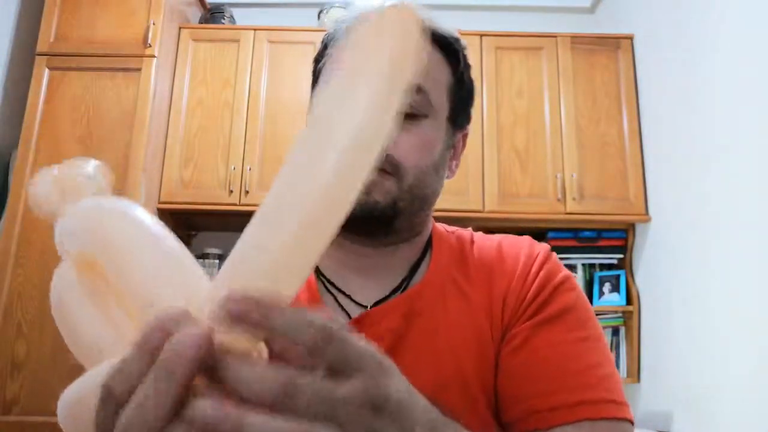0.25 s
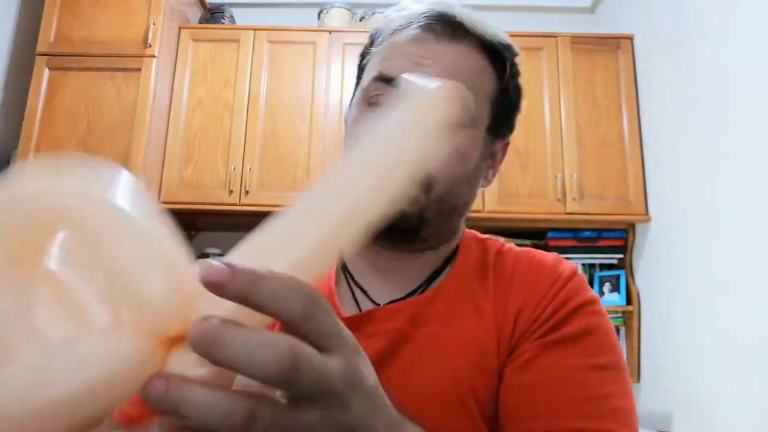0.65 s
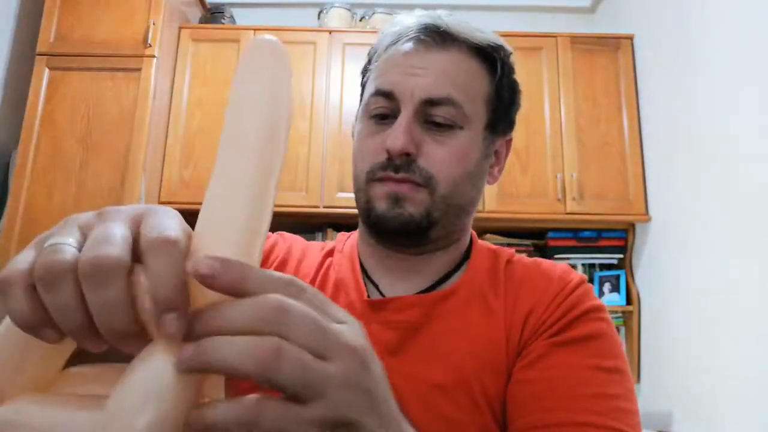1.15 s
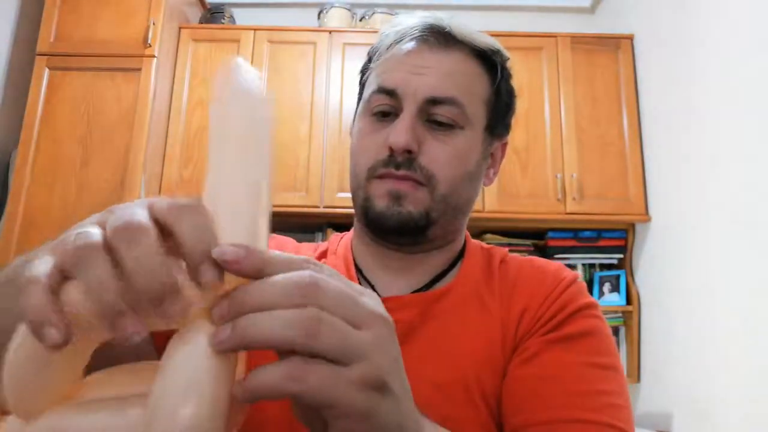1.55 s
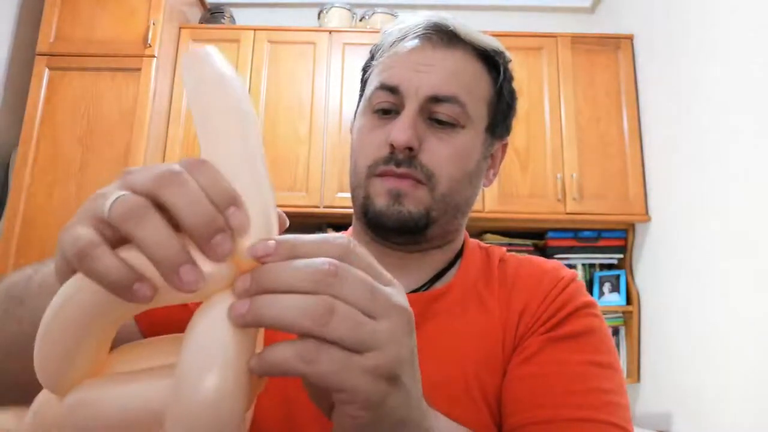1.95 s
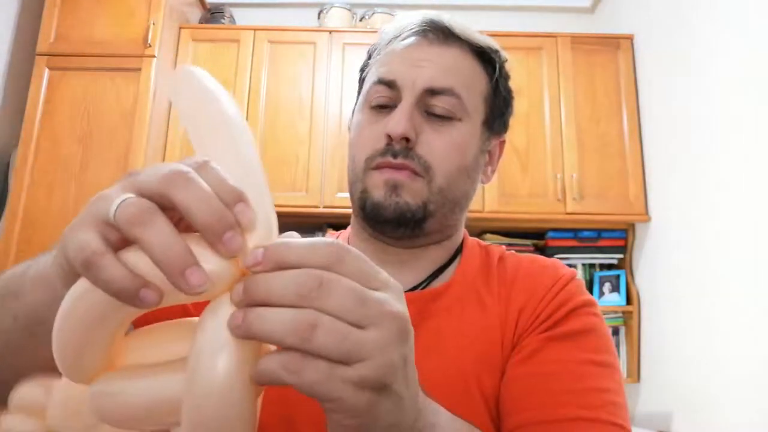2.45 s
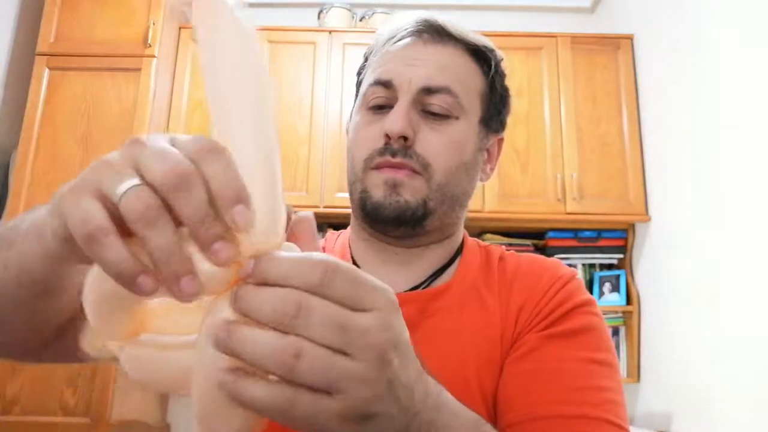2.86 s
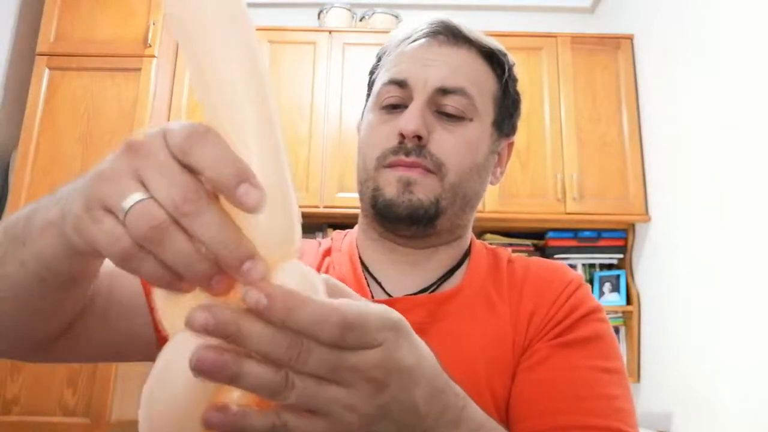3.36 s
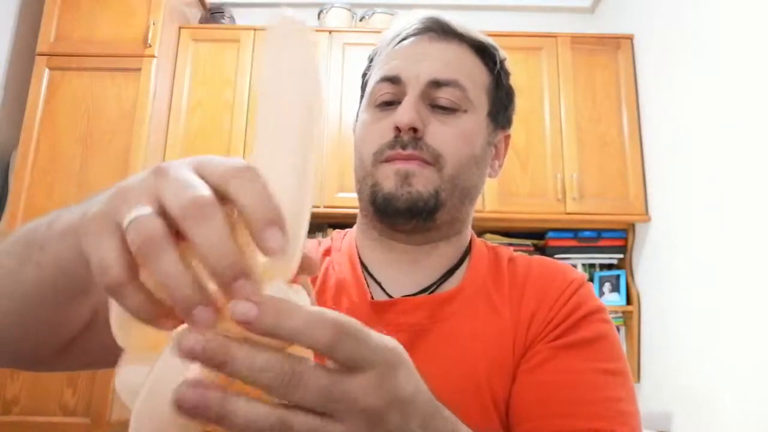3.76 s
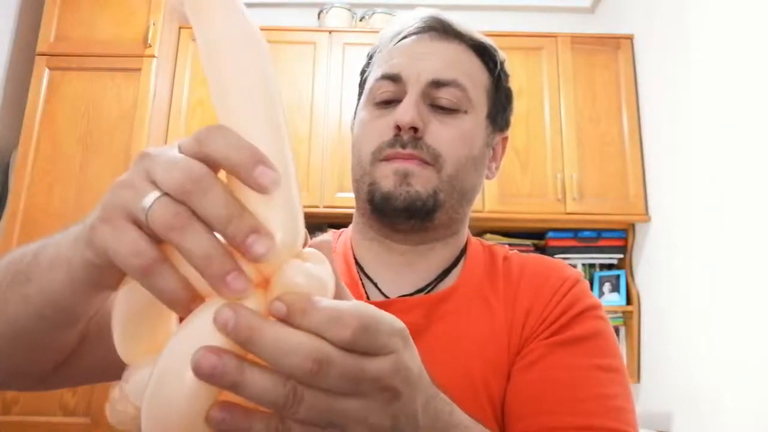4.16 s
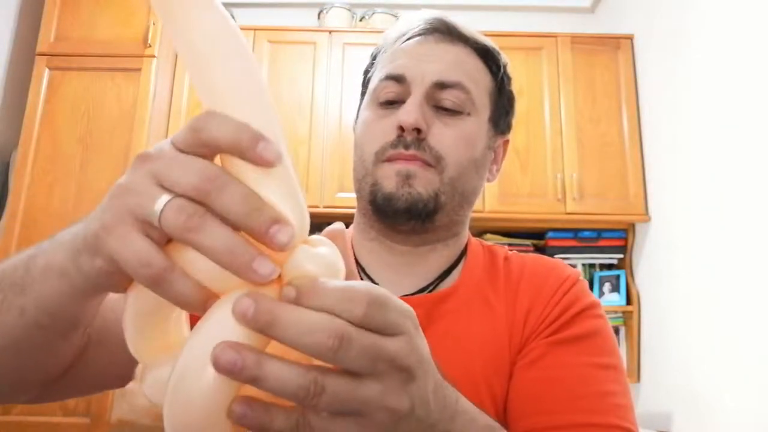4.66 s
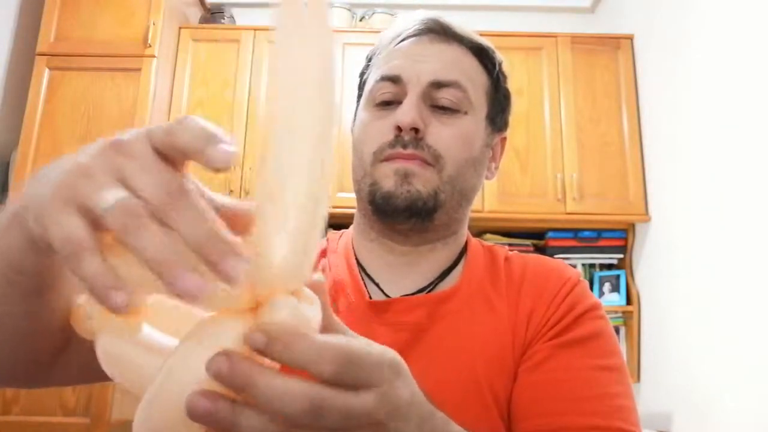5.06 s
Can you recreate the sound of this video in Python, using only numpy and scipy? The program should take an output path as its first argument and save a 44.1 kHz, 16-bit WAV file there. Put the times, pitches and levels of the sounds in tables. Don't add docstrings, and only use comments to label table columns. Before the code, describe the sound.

Long latex balloons are twisted close to the microphone, with sharp rubbery snaps, stuttering crackle, brief squeaks and soft hollow thuds in a small room.

```python
import sys
import numpy as np
from scipy import signal
from scipy.fft import rfft, irfft, next_fast_len
from scipy.io import wavfile
from scipy.ndimage import uniform_filter1d

SR = 44100
rng = np.random.default_rng(int(sys.argv[2]) if len(sys.argv) > 2 else 0)


def wav_out(sig):
    wavfile.write(sys.argv[1], SR, np.round(np.clip(np.atleast_2d(sig).T, -1, 1) * 32767).astype(np.int16))


def ratio(d):
    e = np.asarray(d, float) / 20
    return 10 ** e


N = 233818

# (frequency [Hz], width [Hz], level [dB])
SKIN_MODES = [(1000, 458, -1), (1230, 496, 1.5), (1820, 474, 3), (2320, 316, 6), (2628, 404, 3)]
# (frequency [Hz], width [Hz], level [dB])
SHEEN_MODES = [(3330, 650, -3.5), (5139, 1290, 6), (5390, 990, 7.5), (7350, 2480, -6.5), (10970, 3160, -8),
               (12500, 1600, -53)]
# (frequency [Hz], width [Hz], level [dB])
TUBE_MODES = [(51, 31, -10), (105, 20, -3), (161, 20.6, -0.5), (270, 102, -2.5), (426, 145, -4.5),
              (581, 188, -4.5)]
# (time [s], ring of the gripped patch [Hz], treble over skin [dB])
GRIP_CURVE = [(0, 1970, -10.5), (.2, 2310, -3), (.33, 2120, -5.5), (.5, 1460, -2), (.68, 1000, -13.5),
              (.83, 2090, -12), (.92, 2130, -0.5), (1.3, 1690, -6.5), (1.6, 1980, -4.5), (1.8, 2100, -8),
              (2.1, 2400, -7), (2.3, 2050, -4.5), (2.42, 2200, -8.5), (2.6, 1690, -3), (3.9, 1920, -6.5),
              (4.3, 2730, -6.5), (4.62, 1180, -5), (4.8, 1670, -6)]
# (start [s], length [s], first pitch [Hz], last pitch [Hz], skin level [dB])
SQUEAK_TRAINS = [
    (0.767, 0.039, 93.1, 100.2, -42),
    (.841, 0.051, 152.3, 161, -39),
    (1.404, 0.033, 296, 300, -22),
    (1.609, 0.014, 595, 672, -18),
    (1.623, 0.021, 672, 632, -28),
    (1.657, 0.018, 641, 640, -24.5),
    (1.918, 0.011, 270, 256, -27),
    (2.004, 0.062, 279, 245.6, -31),
    (4.619, 0.1, 144.2, 149.5, -36.5),
    (4.754, 0.18, 201.6, 180, -34),
]


def level(x, db):
    return x * ratio(db) / np.sqrt(np.mean(x ** 2))


def along(table, t, axis):
    return np.interp(t, np.array(table)[:, 0], np.array(table)[:, axis])


def read(table, size):
    hz, value = np.transpose(table)
    return np.interp(np.log(np.fft.rfftfreq(size, 1 / SR) + 1), np.log(hz), value)


def walk(rate):
    held = int(SR / rate)
    steps = rng.standard_normal(N // 50 + 1)[:N // held + 1]
    return uniform_filter1d(np.repeat(steps, held), held // 2 + 1)[:N]


def modes(table, size):
    f = np.fft.rfftfreq(size, 1 / SR) + 1
    response = 0
    for k, (hz, width, db) in enumerate(table):
        response = response + (-1) ** k * ratio(db) / (1 + 1j * (f - hz ** 2 / f) / width)
    return response / np.sqrt(np.mean(abs(response) ** 2))


def ring(force, response):
    return irfft(rfft(force, 2 * (len(response) - 1)) * response)[..., :force.shape[-1]]


def skin(size):
    f = 1j * np.fft.rfftfreq(size, 1 / SR) / 750
    return modes(SKIN_MODES, size) * (f ** 2 / (1 + 0.76 * f + f ** 2)) ** 2


def glide(s, length, first_hz, last_hz):
    n = int(length * SR)
    hz = np.linspace(first_hz, last_hz, n)
    swell = np.sin(np.pi * np.linspace(.2, .97, n)) ** .5
    return int(s * SR), hz, np.cumsum(hz) / SR, swell


def hush(size):
    # (frequency [Hz], level [dB])
    colour = [(18, -24), (30, 5), (153, -3.5), (1250, -29), (14400, -21.5), (16000, -41)]
    noise = ring(rng.standard_normal((3, N)), ratio(read(colour, size)))
    return level(noise, -53.5 - 3)


def room(near):
    t60_s, tail_db, band_hz = 0.26, -12.5, [300, 7600]
    t = np.arange(SR // 2) / SR
    decay = np.exp(-np.log(1000) * t / t60_s)
    late = np.clip(t / .006 - .3, 0, 1)
    tail = rng.standard_normal((2, len(t))) * decay * late
    tail = signal.sosfilt(signal.butter(2, band_hz, "band", fs=SR, output="sos"), tail)
    tail /= np.sqrt(np.sum(tail ** 2, axis=1, keepdims=True))
    return ratio(tail_db) * signal.fftconvolve(near, tail, axes=1)[:, :N]


def thuds(size=8192):
    # (time [s], peak level [dB], pitch [Hz])
    bumps = [(.044, -22, 300), (.177, -23, 229), (.305, -22, 129), (.469, -24, 166), (0.612, -24, 178),
             (.923, -15, 126), (0.929, -22, 46.3), (1.099, -24.5, 109), (1.2, -31, 120), (1.79, -38, 298),
             (2.2, -33.5, 200), (2.729, -33, 453), (2.96, -34, 56), (3.071, -27, 105), (3.061, -24, 251),
             (3.129, -34, 192), (3.238, -19.5, 150), (3.272, -16.5, 215), (3.331, -15, 219),
             (3.354, -18.5, 126), (3.534, -17.5, 166), (3.616, -17, 161), (3.681, -20.5, 170),
             (3.693, -19, 170), (3.776, -20, 175), (3.834, -21.5, 370), (4.075, -19.5, 249),
             (4.18, -29, 228), (4.248, -26, 190), (4.278, -24.5, 169), (4.357, -22.5, 151),
             (4.374, -21.5, 161), (4.43, -27, 160), (4.617, -27, 446), (4.7, -36, 70), (4.873, -29.5, 308),
             (5.225, -27.5, 138), (5.277, -27, 526)]
    out, t = np.zeros(N + size), np.arange(size) / SR
    for s, db, hz in bumps:
        push = np.sin(2 * np.pi * np.clip(t * hz * 1.9, 0, 1))
        swing = ring(push, modes([(hz, .3 * hz, 0)], size) + .7 * modes(TUBE_MODES, size))
        out[int(s * SR):][:size] += ratio(db - 1.5) * swing / abs(swing).max()
    return out[:N]


def pressure():
    # (catch time [s], skin level [dB], build-up [s], fade [dB/s])
    strokes = [(0, -25.5, .01, 20), (.045, -23, .012, 86), (0.161, -25, 0.017, 100),
               (.309, -27, 0.014, 150), (0.441, -24, 0.011, 144), (.659, -31.5, 0.072, 420),
               (.832, -37, 0.22, 5), (.93, -31, 0.65, 10), (1.224, -22.5, 0.2, 184),
               (1.41, -17, 0.0076, 182), (1.604, -25.5, 0.11, 52), (1.72, -30.5, .03, 47),
               (1.85, -29, .03, 20), (1.931, -23.5, 0.15, 480), (2.005, -27, 0.023, 60),
               (2.1, -27.5, .01, 110), (2.2, -34, .01, 200), (2.294, -34.5, .006, 3),
               (2.43, -28.5, .01, 40), (2.538, -29.5, 0.85, 64), (2.79, -27.5, 0.051, 15),
               (3.114, -26, 0.0097, 8), (3.2, -24, 0.054, 23), (3.33, -25, .02, 33), (3.49, -23.5, .03, 20),
               (3.625, -24.5, 0.85, 600), (3.688, -23.5, 0.074, 56), (3.835, -30, .01, 20),
               (3.981, -23.5, 0.15, 26), (4.07, -24.5, .02, 35), (4.272, -29, .01, 26),
               (4.43, -32.5, .1, 70), (4.515, -33.5, .04, 200), (4.614, -30.5, 0.022, 9.5),
               (4.723, -31, .02, 3), (4.889, -19, 0.87, 332), (4.975, -22.5, 0.034, 123),
               (5.22, -34.5, 0.014, 2), (5.3, -31, 0.51, 5)]
    # (time [s], extra drop [dB])
    lifts = [
        (.3, 4.2),
        (.6, 10),
        (2.287, 49),
        (2.765, 7.4),
        (3.101, 12),
        (3.825, 11),
        (4.608, 12),
        (5.172, 47),
    ]
    build_db, lift_s = 25, 0.036
    t = np.arange(N) / SR
    s, db, build, fade = np.transpose(strokes)
    k = np.clip(np.searchsorted(s, t), 1, len(s) - 1)
    fading = db[k - 1] - fade[k - 1] * (t - s[k - 1])
    for lift, drop_db in lifts:
        before_next = t < s[np.searchsorted(s, lift)]
        fading = fading - drop_db * np.clip(1 - (lift - t) / lift_s, 0, 1) * before_next
    building = db[k] - build_db * (s[k] - t) / build[k]
    return np.maximum(fading, building)


def unlocked():
    gain = np.ones(N)
    for s, length, *_ in SQUEAK_TRAINS:
        gain[int(s * SR):int((s + length) * SR)] = .5
    return uniform_filter1d(gain, size=150)


def shares(table, size):
    f = np.fft.rfftfreq(size, 1 / SR) + 1
    near = np.array([1 / (1 + (8 * np.log(f / hz)) ** 2) for hz, _, _ in table])
    return near / near.sum(axis=0)


def wander(force, table, size, spread_db):
    favour_db, favour_octaves = 4, 0.2
    rung = rfft(force, size) * modes(table, size)
    patch_hz = along(GRIP_CURVE, np.arange(N) / SR, axis=1)
    out = 0
    for (hz, _, _), share in zip(table, shares(table, size)):
        near_db = favour_db * np.exp(-(np.log2(hz / patch_hz) / favour_octaves) ** 2)
        out = out + ratio(spread_db * walk(18) + near_db) * irfft(rung * share)[:, :N]
    return out


def rub(size):
    # (time [s], tube over skin [dB])
    looseness = [(.35, -6), (.68, -1), (.86, -14.5), (.95, 1), (1.24, -7.5), (1.36, -7), (1.42, -24.5),
                 (1.53, -11), (1.62, -22.5), (2, -25), (2.22, -8.5), (2.33, -24.5), (2.75, -7), (3.4, -4.5),
                 (4.05, -12.5), (4.66, -8), (4.84, -23.5), (5, -5.5)]
    skin_db = pressure()
    t = np.arange(N) / SR
    treble_db = skin_db + along(GRIP_CURVE, t, axis=2)
    tube_db = uniform_filter1d(skin_db, size=1500) + along(looseness, t, axis=1)

    slip = (rng.random(N) < 3000 / SR) * ratio(3.5 * np.minimum(rng.exponential(size=N), 4))
    stutter = ratio(3.0 * walk(150) + .8 * walk(35))
    force = (slip + .4) * rng.standard_normal((3, N)) * stutter * unlocked()
    shove = rng.standard_normal((3, N)) * ratio(2.5 * walk(45)) * stutter ** .6

    wall = wander(level(force, -5.4) * ratio(skin_db), SKIN_MODES, size, 3.3)
    wall = ratio(-1.0) * ring(wall, skin(size) / modes(SKIN_MODES, size))
    sheen = ring(level(force, -2.6) * ratio(treble_db), modes(SHEEN_MODES, size))
    air = wander(level(shove, -1.35) * ratio(tube_db), TUBE_MODES, size, 4.2)
    return wall + sheen + air


def hums():
    # (start [s], length [s], first pitch [Hz], last pitch [Hz], level [dB])
    tones = [(.768, 0.059, 191, 200, -39), (0.779, 0.058, 279, 291, -39), (.841, 0.13, 158.4, 161, -27.5),
             (0.851, 0.095, 1766, 1860, -32.5), (0.869, 0.068, 918, 994, -35.5),
             (.89, .05, 2170, 2180, -30), (1.414, 0.032, 1729, 1820, -14), (1.409, 0.035, 888, 927, -24.5),
             (1.41, 0.023, 1156, 1245, -20.5), (1.605, 0.015, 568, 677, -16.5),
             (1.62, 0.031, 666, 622, -26.5), (1.656, .03, 642, 630, -44), (0.852, 0.068, 1540, 1614, -37),
             (0.861, .06, 1950, 2000, -41), (1.915, 0.021, 1073, 1142, -24), (4.619, 0.1, 277.5, 292, -37),
             (4.62, 0.095, 437, 448, -34.5), (4.625, 0.073, 863, 920, -37), (5.09, 0.064, 157, 158, -40)]
    shake_db, waver_rad = 1.8, .3
    out = np.zeros(N)
    chance = uniform_filter1d(rng.standard_normal((len(tones), 2, 8000)), size=220) * np.sqrt(220)
    for (*slide, db), (shake, waver) in zip(tones, chance):
        i, hz, turns, shape = glide(*slide)
        n = len(hz)
        rough = np.sqrt(hz / 1000)
        swell = shape * np.clip(np.arange(n) / (.25 * n), .5, 1)
        gain = ratio(db - 3.0 + shake_db * rough * shake[:n])
        out[i:i + n] += gain * swell * np.sin(2 * np.pi * turns + waver_rad * rough * waver[:n])
    return out


def streaks():
    # (start [s], length [s], first pitch [Hz], last pitch [Hz], level [dB])
    rough_tones = [(0.04, 0.0086, 1970, 1970, -22), (1.18, 0.062, 855, 795, -28),
                   (1.239, 0.038, 1500, 1470, -31), (1.408, 0.042, 5810, 5740, -29.5),
                   (1.409, 0.022, 4600, 4720, -27), (1.41, 0.043, 2220, 2245, -20),
                   (1.429, .025, 3780, 3930, -32), (1.608, .016, 1173, 1325, -24),
                   (1.613, .014, 1860, 2000, -20), (1.632, .02, 1315, 1290, -31),
                   (1.664, 0.018, 1740, 1920, -23), (1.668, 0.02, 2430, 2466, -26),
                   (1.787, 0.013, 1153, 1140, -28.5), (1.869, 0.045, 1604, 1556, -32),
                   (2.589, 0.011, 1810, 1770, -17), (2.799, 0.022, 2480, 2710, -26),
                   (2.797, 0.021, 1586, 1550, -28), (3.03, .018, 1313, 1000, -24.5),
                   (3.115, 0.022, 2600, 2700, -27), (3.121, 0.031, 1650, 1490, -27.5),
                   (3.256, .03, 1814, 1805, -25), (3.326, 0.059, 1720, 1760, -23),
                   (3.534, .012, 1680, 1590, -20.5), (3.67, 0.047, 1497, 1395, -25.5),
                   (3.831, 0.011, 1750, 1720, -21), (3.99, 0.062, 1897, 1810, -31),
                   (4.064, 0.028, 1053, 1000, -24.5), (4.12, .03, 1060, 1070, -34),
                   (4.07, 0.087, 249.5, 230, -33), (4.63, 0.069, 1800, 1740, -29),
                   (4.64, 0.061, 900, 927, -30), (4.756, 0.079, 1880, 1750, -29),
                   (4.76, 0.082, 989, 948, -30.5), (4.85, 0.056, 1594, 1550, -28),
                   (4.859, 0.044, 1000, 984, -26.5), (4.86, .03, 1860, 1830, -31),
                   (4.976, 0.021, 1947, 1930, -25), (5.021, .025, 1930, 1980, -32),
                   (5.062, 0.011, 1905, 1890, -21), (2.556, 0.035, 550, 502, -35.5)]
    width_hz = 240
    out = np.zeros((3, N))
    chance = rng.standard_normal((len(rough_tones), 2, 3, 6000))
    lowpass = signal.butter(2, width_hz / 2, fs=SR)
    for (*slide, db), noise in zip(rough_tones, chance):
        i, hz, turns, shape = glide(*slide)
        re, im = signal.lfilter(*lowpass, noise)[..., 1500:1500 + len(hz)]
        tremble = (re + 1j * im) * np.sqrt(SR / width_hz / 2) + .45
        out[:, i:i + len(hz)] += ratio(db) * shape * np.imag(tremble * np.exp(2j * np.pi * turns))
    return out


def squeaks(size):
    jitter = .07
    force = np.zeros((3, N))
    for *slide, db in SQUEAK_TRAINS:
        i, hz, turns, shape = glide(*slide)
        at = np.flatnonzero(np.diff(np.floor(turns), prepend=-1))
        chance = rng.standard_normal((200, 3, 2))[:len(at)].T
        for path in range(3):
            late = (at + (1 + jitter * chance[0, 0] + .1 * path) * SR / hz[at]).astype(int)
            strength = ratio(db + 20 * jitter * chance[1, path])
            force[path, i + late] += strength * shape[at] * np.sqrt(SR / hz[at])
    return ring(force, skin(size) + ratio(-9.0) * modes(SHEEN_MODES, size))


def slips():
    # (time [s], skin peak [dB], treble peak [dB])
    ticks = [(.04, -4.5, -9), (0.0712, -8, -10), (0.2302, -16, -23), (0.4468, -4.5, -9), (0.974, -6, -37),
             (1.212, -9, -28), (1.451, -6.5, -20), (1.5634, -14, -21), (1.7493, -25, -17),
             (2.1763, -5.5, -15), (2.291, -3, -11.5), (2.428, -11.5, -29), (2.5378, -2, -5),
             (2.7714, -13.5, -7.5), (2.8685, -18, -12), (3.0052, -9.5, -13.5), (3.356, -11, -11),
             (3.5358, -8.5, -10.5), (3.609, -6.5, -22), (3.7003, -7, -16), (4.004, -6, -12),
             (4.109, -5.5, -8.5), (4.1539, -5.5, -7), (4.269, -4.5, -9), (4.298, -9.5, -7),
             (4.3604, -11.5, -6.5), (4.409, -6.5, -7), (4.4325, -10, -8.5), (4.7187, -1.5, -4.5),
             (4.792, -12.5, -13.5)]
    # (time [s], skin peak [dB], treble peak [dB])
    tears = [(.082, -11.5, -15), (0.1579, -5.5, -10), (0.3056, -8.5, -4.5), (.521, -13, -21.5),
             (0.611, -16.5, -39), (1.06, -15.5, -37), (1.5225, -20, -44), (1.847, -15, -16.5),
             (1.9443, -20, -13.5), (2.0031, -12.5, -17.5), (2.0094, -12, -16), (2.142, -16.5, -19.5),
             (2.334, -16.5, -17.5), (2.592, -10, -1.5), (2.9639, -10, -16.5), (3.063, -10.5, -24),
             (3.275, -9, -25), (3.33, -6.5, -18), (3.3882, -12, -14.5), (3.4423, -14, -15.5),
             (3.489, -13.5, -14), (3.669, -15, -22), (3.831, -12, -16.5), (3.89, -16, -16),
             (3.9703, -9.5, -20), (4.0862, -4, -12), (4.1826, -6.5, -11), (4.3448, -3.5, -4.5),
             (4.728, -17, -6.5), (5.2199, -7.5, -39)]
    # (time [s], skin peak [dB], treble peak [dB], slip length [ms])
    scuffs = [(.175, -9, -13, 8.9), (0.2725, -19.5, -32, 14), (0.9306, -13.5, -42, 8.7),
              (1.045, -17, -32, 7), (1.1808, -19, -33, 19), (1.5777, -11, -23, 21), (1.719, -27, -37, 7.4),
              (1.7893, -13.5, -45, 9.4), (2.361, -18.5, -26, 23), (2.7264, -20.5, -40, 5.8),
              (2.799, -15.5, -31, 35), (2.9305, -10.5, -32, 58), (3.0264, -9.5, -19, 18),
              (3.2126, -10, -19, 13), (3.251, -13, -14.5, 29), (3.618, -12, -16, 12),
              (3.7356, -19, -15, 8.2), (4.067, -8, -10.5, 9.6), (4.5148, -17, -23.5, 18),
              (4.616, -7.5, -21, 4.5), (4.635, -18, -19, 25), (4.6781, -16, -22, 15), (4.948, -16, -41, 9),
              (4.971, -10.5, -18, 12), (5.064, -12, -16, 6.7), (5.272, -9, -12, 11)]
    # (first [s], last [s], spacing [ms], skin peak [dB], treble peak
    # [dB])
    creaks = [(2.454, 2.46, 6.3, -14, -24), (2.4836, 2.498, 12.9, -15, -19.5),
              (2.5022, 2.532, 8.5, -12.5, -38), (3.1061, 3.12, 13, -13.5, -22),
              (3.163, 3.197, 24, -18, -14.5), (3.75, 3.768, 9, -12, -39), (3.9035, 3.904, 9, -12.5, -29),
              (4.58, 4.582, 9, -15, -21.5), (2.06, 2.061, 9, -14, -23), (1.5575, 1.558, 9, -21, -40),
              (.6654, .666, 9, -20.5, -47), (1.393, 1.396, 9, -21, -48), (1.46, 1.499, 6.7, -33, -33),
              (3.4156, 3.452, 36, -17.5, -20)]
    tick_ms, tear_ms = 3.7, 5.9
    rows = [(*r, tick_ms) for r in ticks] + [(*r, tear_ms) for r in tears] + list(scuffs)
    for first, last, spacing_ms, db, treble_db in creaks:
        for s in np.arange(first, last + 1e-4, spacing_ms / 1000):
            rows.append((s, db, treble_db, tick_ms))
    return [(s, db, along(GRIP_CURVE, s, axis=1), treble_db, ms) for s, db, treble_db, ms in rows]


def snaps(rows, size=4096):
    out, t = np.zeros((3, N + size)), np.arange(size) / SR
    freed = [(hz, .65 * width, db) for hz, width, db in SKIN_MODES]
    wall = skin(size) / modes(SKIN_MODES, size) * modes(freed, size)
    sheen = modes(SHEEN_MODES, size) * modes([(4600, 5000, 0)], size)
    jerk = 14 * (t == 0)
    chance = rng.standard_normal((len(rows), 3, size))
    for (s, db, hz, treble_db, ms), noise in zip(rows, chance):
        slide = np.exp(-(t * 1400 / max(ms, .3)) ** 1.2)
        force = noise * (slide + 3 * np.exp(-t / 0.0004) + 0.16 * np.exp(-t / 0.013))
        body = ring(force + jerk, wall + 0.83 * modes([(hz, 330, 0)], size))
        edge = ring(force + jerk / 2, sheen)
        body = body / abs(body).max(axis=1, keepdims=True)
        edge = edge / abs(edge).max(axis=1, keepdims=True)
        i = int(s * SR)
        out[:, i:i + size] += ratio(db - 1.5) * body + ratio(treble_db + 0.5) * edge
    return out[:, :N]


def ports(paths, size):
    # (frequency [Hz], share [0-1])
    likeness = [(60, 0.97), (150, 0.98), (300, 0.93), (640, 0.37), (1400, 0.83), (3100, 0), (12000, 0)]
    # (frequency [Hz], level [dB])
    balance = [(200, 0.5), (380, -4), (700, -2), (1300, 2), (2400, 4.5), (4400, -0.5), (8100, -10.5),
               (13000, 3.5)]
    # (frequency [Hz], phase [rad])
    lead = [(60, -0.036), (340, -0.83), (640, -1.33), (950, 0.33), (1900, -0.014)]
    like = np.clip(read(likeness, size), 0, 1)
    tilt = ratio(read(balance, size) / 2)
    both, left, right = rfft(paths, size)
    left = (like ** .5 * both + (1 - like) ** .5 * left) * tilt * np.exp(1j * read(lead, size))
    right = (like ** .5 * both + (1 - like) ** .5 * right) / tilt
    return irfft(np.array([left, right]), size)[:, :N]


def scene():
    # (time [s], skin peak [dB], ring [Hz], treble peak [dB], length [ms])
    flicks = [(.0115, -20, 2210, -25, 3), (.438, -17, 2410, -21, 2.4), (.442, -14, 2000, -17, 3.2),
              (.964, -19, 1900, -32, 5.5), (1.055, -16, 2200, -28, 4), (1.1233, -24, 1980, -34, 3),
              (1.1363, -20, 1290, -28, 7), (1.1603, -21, 2160, -24, 4), (1.2224, -10, 2200, -26, 3.8),
              (1.2364, -14, 1800, -18, 4.5), (1.2584, -20, 1350, -21, 6), (1.2744, -24, 1500, -26, 6),
              (1.3309, -31, 1455, -27, 4), (1.3483, -21.5, 1040, -31, 6), (1.4085, -8.5, 2000, -13, 6.5),
              (1.5843, -17, 2320, -27, 3.6), (1.7389, -23, 2230, -34, 5), (2.0971, -19.5, 2700, -35, 3.6),
              (2.1959, -20, 1860, -28, 10), (2.4335, -19, 2200, -21, 4), (2.4405, -15.5, 2180, -26, 4.5),
              (2.447, -20, 2210, -22, 4), (2.613, -19.5, 1800, -28, 7), (2.7784, -19, 1590, -27, 4),
              (3.1896, -13, 1740, -26, 10), (3.2184, -12, 1670, -24, 5), (3.2444, -15, 1660, -27, 5),
              (3.339, -13, 1723, -26, 6.2), (3.375, -11.5, 1763, -18, 8), (3.5813, -19, 2300, -30, 5),
              (3.688, -15, 1800, -24, 5), (3.7416, -13, 2300, -24, 5), (4.043, -15, 2000, -15, 4),
              (4.075, -15, 1600, -22, 5), (4.4932, -16, 2340, -23, 8.1), (4.6614, -22.5, 891, -30, 8),
              (4.7014, -23, 900, -28, 6), (4.986, -12.5, 1710, -15, 5.5), (5.108, -26, 1800, -24, 5),
              (5.197, -37, 1200, -46, 10)]
    size = 2 * next_fast_len(N // 2 + 4096)
    paths = hush(size)
    paths = paths + snaps(slips()) + thuds() + rub(size) + squeaks(size)
    paths = paths + snaps(flicks) + streaks() + hums()
    near = ports(paths, size)
    return ratio(-2.0) * (near + room(near))


def top_cut(x):
    return signal.sosfilt(signal.butter(12, 16510, fs=SR, output="sos"), x)


def record(dry):
    x = signal.sosfilt(signal.butter(8, 14300, fs=SR, output="sos"), dry)
    x = np.tanh(.8 * x) / .72
    return top_cut(x)


dry = scene()
out = record(dry)
wav_out(out)
```